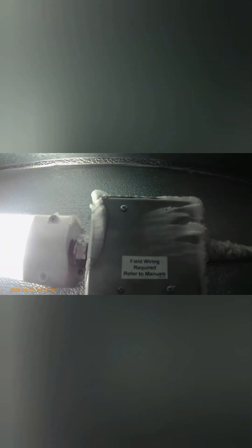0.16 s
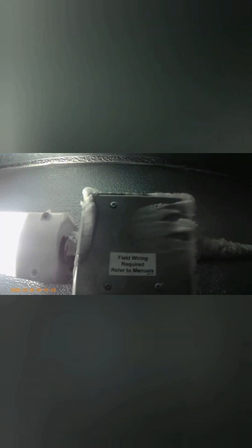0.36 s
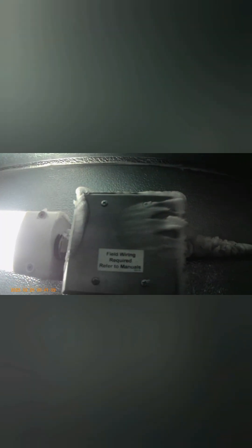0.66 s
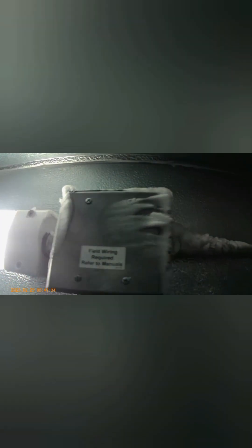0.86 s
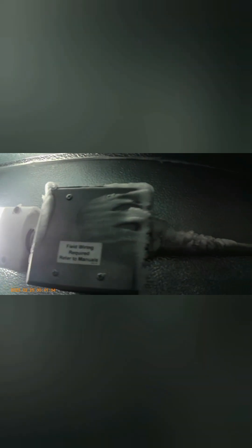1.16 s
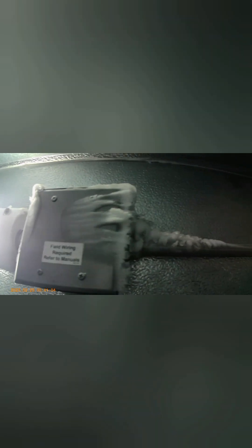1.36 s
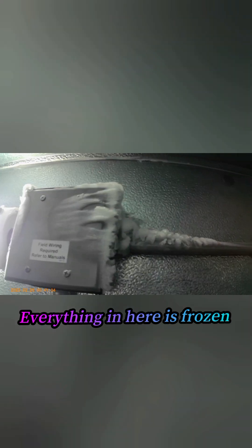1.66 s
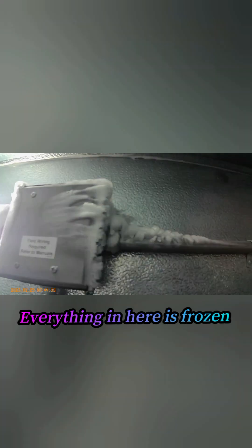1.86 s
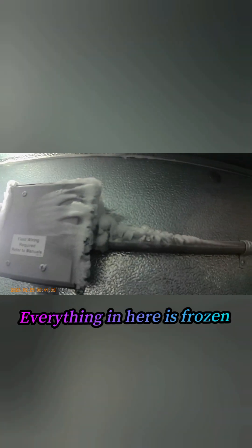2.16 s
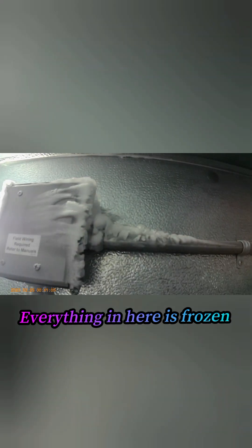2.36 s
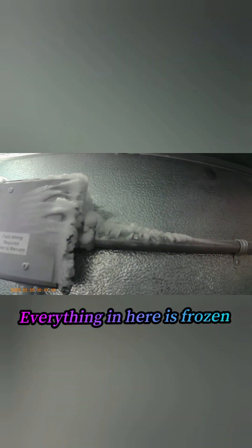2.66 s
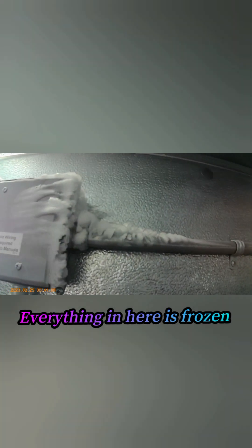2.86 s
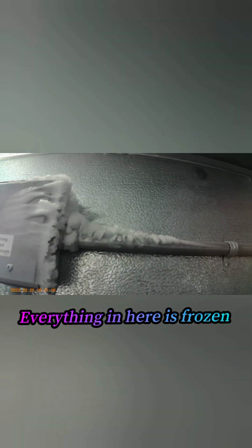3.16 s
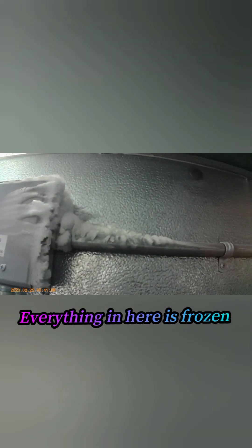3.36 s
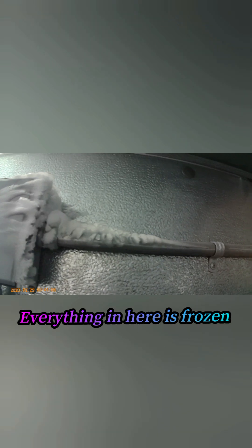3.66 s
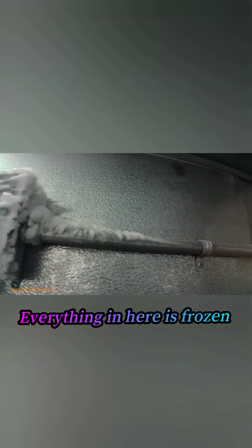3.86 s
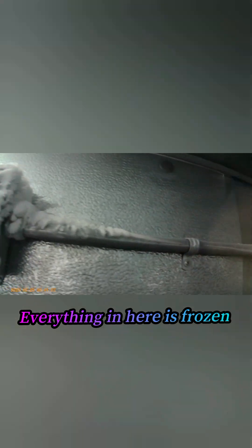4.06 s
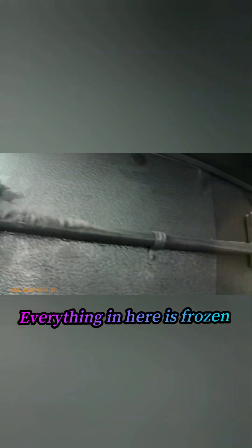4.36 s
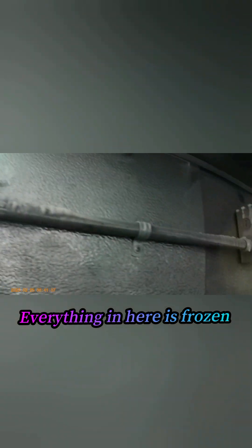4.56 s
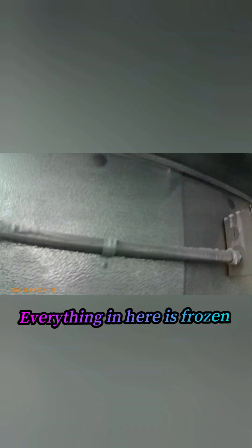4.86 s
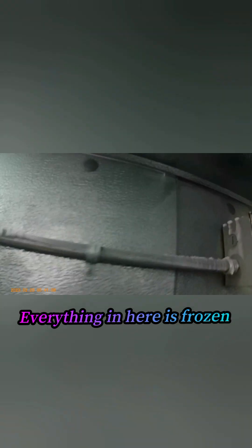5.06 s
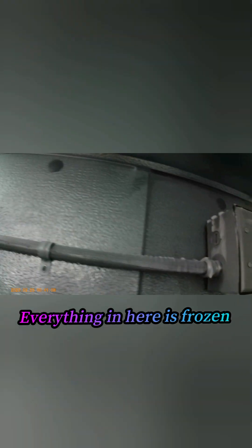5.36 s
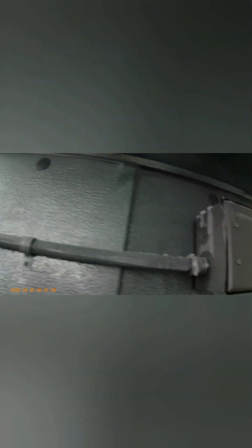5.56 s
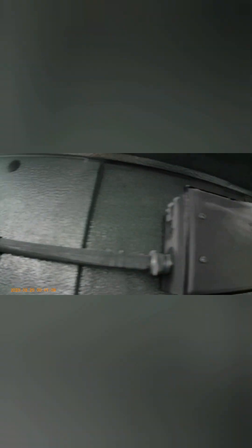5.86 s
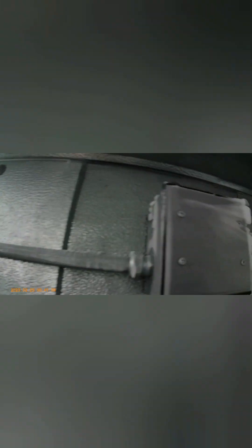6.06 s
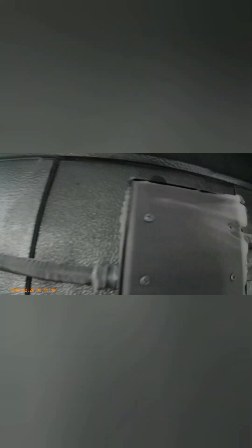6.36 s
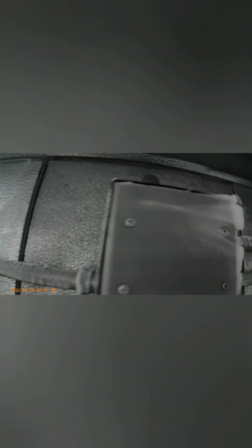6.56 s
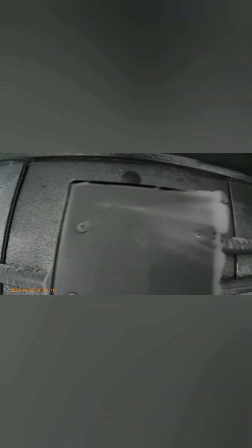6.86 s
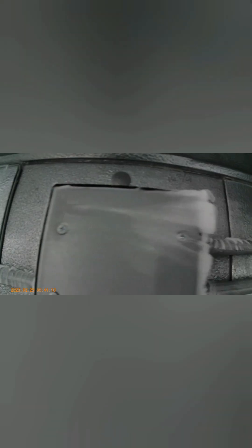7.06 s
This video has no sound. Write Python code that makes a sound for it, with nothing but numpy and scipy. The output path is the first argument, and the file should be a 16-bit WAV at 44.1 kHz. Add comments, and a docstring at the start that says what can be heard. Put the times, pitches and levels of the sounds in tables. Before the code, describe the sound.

Freezer fans drone loudly, steady low tones swelling and fading over rushing air, with tiny ticks midway and heavy wind thumps on the microphone near the end.

```python
"""Evaporator fans run in a walk-in freezer while the microphone is carried slowly along the wall.
Their tones, sums of sines at multiples of the shaft rate, swell and fade in the standing waves of the
metal room. Steady sines make the motor hum; shaped and resonant noise makes the rush of air.
Rumbling noise and single pressure swings buffet the microphone, most strongly in the last two seconds.
Before that come three small ticks, each a burst of noise with a ringing decay."""
import sys
import numpy as np
from scipy import signal
from scipy.fft import rfft, irfft
from scipy.io import wavfile

SR = 44100
rng = np.random.default_rng(int(sys.argv[2]) if len(sys.argv) > 2 else 0)


def wav_out(sig):
    """Save sig, one row per channel (or a flat mono array), as 16-bit PCM at SR to the path in sys.argv[1]."""
    wavfile.write(sys.argv[1], SR, np.round(np.clip(np.atleast_2d(sig).T, -1, 1) * 32767).astype(np.int16))


N = 317961
TIME = np.arange(N) / SR  # s


def from_db(db):
    """Logarithmic level: 20 dB is a factor of ten in amplitude."""
    return 10 ** (np.asarray(db) / 20)


def rms_one(x):
    """Power normalisation: scale to a root-mean-square of 1."""
    return x / np.sqrt(np.mean(np.abs(x) ** 2))


def in_time(rows):
    """Linear interpolation: each column of a time curve at every sample."""
    s, *columns = np.transpose(rows)
    return np.squeeze([np.interp(TIME, s, column) for column in columns])


def drift(rate):
    """Low-pass random process: slow chance with spread 1, changing about `rate` times a second."""
    step = 100  # samples between computed values
    settling = 2000  # steps discarded while the filter settles
    r = np.exp(-2 * np.pi * rate * step / SR)
    white = rng.standard_normal(N // step + settling + 2)
    slow = signal.lfilter([1], [1, -2 * r, r * r], white)[settling:]
    return np.interp(np.arange(N) / step, np.arange(len(slow)), rms_one(slow - slow.mean()))


def colour(x, spectrum):
    """Spectral shaping: give a flat-spectrum sound the density `spectrum`, in dB per Hz."""
    hz, db = np.transpose(spectrum)
    bins = np.maximum(np.fft.rfftfreq(N, 1 / SR), 1)
    # straight lines over log frequency; silence outside the table
    gain = from_db(np.interp(np.log(bins), np.log(hz), db, left=-200, right=-200))
    return irfft(rfft(x) * gain, N) * np.sqrt(SR / 2)


def noise(spectrum):
    """Stationary random noise with the given spectral density."""
    return colour(rng.standard_normal(N), spectrum)


def band_around(x, hz, width_hz):
    """Heterodyne filter: shift a band to zero, low-pass it and shift it back; its centre may glide."""
    carrier = np.exp(2j * np.pi * np.cumsum(hz * np.ones(N)) / SR)
    r = np.exp(-np.pi * width_hz / SR)
    baseband = signal.lfilter([1 - r], [1, -r], x / carrier)
    return 2 * np.real(carrier * baseband)


def resonance(hz, width_hz):
    """Resonance driven by turbulence: noise through the same band twice for steep sides; rms 1."""
    once = band_around(rng.standard_normal(N), hz, width_hz)
    return rms_one(band_around(once, hz, width_hz))


BLADES = 5
THROB_ORDER = 6  # multiple of the shaft rate that throbs
THROB_DB, THROB_PERIOD_S, THROB_PEAK_S = 1.5, .94, 2.93
# Blade-passing tone along the way through the standing waves: start_s [s], level_db [dB rms]
FIRST_BLADE_TONE = [(0.0, -38), (1.1, -41.5), (1.6, -27), (3.3, -27.5), (3.9, -46), (4.4, -24.5),
                    (5.0, -38.5), (5.5, -31), (5.9, -28.5), (6.25, -42), (6.55, -35.5), (7.2, -48)]
# Its octave: start_s [s], level_db [dB rms]
SECOND_BLADE_TONE = [(0.0, -23.5), (0.75, -28), (1.6, -22), (2.2, -25), (3.1, -22), (3.5, -23.5),
                     (4.35, -20.5), (4.7, -24.5), (5.1, -20.5), (5.6, -21.5), (5.93, -28.5), (6.1, -23.5),
                     (6.4, -31), (6.75, -29), (7.0, -23), (7.2, -21.5)]
# Tone at three times the blade-passing rate: start_s [s], level_db [dB rms]
THIRD_BLADE_TONE = [(0.0, -17), (0.3, -21.5), (0.55, -29.5), (1.8, -25), (2.4, -32.5), (3.45, -28.5),
                    (3.9, -34.5), (4.45, -30.5), (4.7, -22.5), (4.88, -34), (5.3, -24), (5.45, -32),
                    (5.62, -20), (5.82, -21.5), (5.9, -35), (5.98, -25), (6.55, -23), (7.2, -35)]
# Other strong tones on the way; the throb is added to one of them.
# multiple of the shaft rate: rows of start_s [s], level_db [dB rms]
STRONG_TONES = { 6: [(0.0, -26.5), (0.5, -22), (1.1, -28.5), (1.7, -30), (4.0, -27.5), (4.4, -31),
                (5.0, -27.5), (7.2, -28)], 13: [(0.0, -33.5), (1.1, -28.5), (3.3, -38), (4.8, -44.5),
                (5.9, -28.5), (7.2, -38.5)], 18: [(0.0, -25), (0.3, -23), (1.9, -28.5), (2.6, -30.5),
                (3.3, -27), (4.5, -36), (5.0, -30), (5.6, -41.5), (7.2, -36.5)], 25: [(0.0, -39),
                (3.9, -37.5), (4.6, -35), (5.55, -28.5), (5.9, -30), (6.25, -32), (6.7, -27.5), (7.0, -26)]}
# Tones loudest at one spot on the way, before a slow random fade.
# multiple of the shaft rate: spot_s [s], level_db [dB rms], fall [dB per s]
LOCAL_TONES = {9: (0.3, -31.5, 0.93), 12: (4.4, -32.5, 4.8), 20: (0.47, -32, 1.9), 24: (9.5, -39.5, 1.8),
               30: (6.1, -35, 0.65), 35: (2.4, -44.5, 0.64), 40: (5.3, -43, 1.7)}
# Weaker tones that fill the whole room, before a slow random fade.
# multiple of the shaft rate: level_db [dB rms]
ROOM_TONES = {4: -43, 7: -36.5, 8: -36.5, 11: -42, 14: -41, 16: -42, 17: -37.5, 19: -47, 21: -44.5, 22:
              -44.5, 27: -46, 28: -48, 42: -49, 44: -52, 46: -59.5, 48: -58.5, 50: -49, 55: -51, 58: -61,
              60: -51, 63: -56.5, 64: -58, 67: -63.5, 73: -60}


def tone_levels(room_fade_db=2.5, local_fade_db=1.0, fade_rate=0.73):
    """Standing waves: each tone's level follows the microphone's way through its crests and nodes."""
    levels = {
        BLADES: in_time(FIRST_BLADE_TONE),
        2 * BLADES: in_time(SECOND_BLADE_TONE),
        3 * BLADES: in_time(THIRD_BLADE_TONE),
    }
    for order, path in STRONG_TONES.items():
        levels[order] = in_time(path)
    # one tone throbs as the fans beat against each other
    throb = np.cos(2 * np.pi * (TIME - THROB_PEAK_S) / THROB_PERIOD_S)
    levels[THROB_ORDER] = levels[THROB_ORDER] + THROB_DB * throb
    for order, (spot_s, db, fall_db_per_s) in LOCAL_TONES.items():
        near_spot_db = db - fall_db_per_s * np.abs(TIME - spot_s)
        levels[order] = near_spot_db + local_fade_db * drift(fade_rate)
    for order, db in ROOM_TONES.items():
        levels[order] = db + room_fade_db * drift(fade_rate)
    return levels


def flutter(depth, rate):
    """Random modulation: turbulent inflow shakes a tone in strength and phase; mean power 1."""
    return rms_one(1 + depth * (drift(rate) + 1j * drift(rate)))


SHAFT_HZ = 26.572
BLADE_SHAKE, SHAFT_SHAKE = .04, .012  # flutter depth, before growing with the root of the order


def fan_tones(wander_hz=0.019, blade_wander_hz=0.0638):
    """Harmonics of rotation: multiples of the shaft rate, among them the wavering blade-passing tones."""
    shaft = 2 * np.pi * np.cumsum(SHAFT_HZ + wander_hz * drift(0.55)) / SR
    blades = shaft + 2 * np.pi * np.cumsum(blade_wander_hz * drift(0.782)) / SR
    out = np.zeros(N)
    for order, db in tone_levels().items():
        # shaft tones are nearly clean; blade tones cut through turbulence, the higher the more shaken
        if order % BLADES:
            turn, depth = shaft, SHAFT_SHAKE
        else:
            turn, depth = blades, BLADE_SHAKE
        shake = flutter(depth=depth * np.sqrt(order), rate=3.5)
        angle = order * turn + rng.uniform(0, 2 * np.pi)
        out += np.sqrt(2) * from_db(db) * np.real(shake * np.exp(1j * angle))
    return out


MOTOR_WAVER_DB = 0.5
# Electric motor hum and whine: pitch_hz [Hz], level_db [dB rms, before the slight waver]
MOTOR = [(58.2, -32), (116.5, -43.5), (225.1, -36.5), (274.5, -40.5), (990.5, -53.5)]


def motor():
    """Line spectrum: clean sines of fixed pitch whose levels waver slightly."""
    out = np.zeros(N)
    for hz, db in MOTOR:
        gain = from_db(db + MOTOR_WAVER_DB * drift(0.37))
        out += np.sqrt(2) * gain * np.sin(2 * np.pi * (hz * TIME + rng.random()))
    return out


ROAR_DB, HISS_DB = 0.5, -0.58  # shift of each spectrum below at the start
AIR_FALL_DB_PER_S = 0.0962  # how slowly roar and hiss recede
HOWL_WIDTH_HZ, WALL_DIP_WIDTH_HZ = 55, 67
# Air churned by the blades: pitch_hz [Hz], density_db [dB per Hz, before shift, fall and flicker]
ROAR = [(20, -69), (45, -64.5), (80, -59.5), (125, -49), (145, -50.5), (195, -49.5), (250, -47),
        (310, -50.5), (400, -53.5), (490, -53.5), (640, -55.5), (780, -55), (970, -64), (1300, -63),
        (1800, -70.5), (2800, -94)]
# Air hissing through the cooling fins: pitch_hz [Hz], density_db [dB per Hz, before the same]
HISS = [(1200, -82.5), (2200, -74.5), (2850, -84), (3450, -81.5), (4000, -86.5), (4750, -95.5),
        (5500, -96.5), (6400, -103), (7000, -110), (7600, -109), (9900, -116.5), (10200, -124),
        (11000, -128)]
# Resonances of the cooler's casing, blown by the air: pitch_hz [Hz], width_hz [Hz],
# level_db [dB rms, before the wall's echo]
CASING = [(574, 58, -36.5), (755, 48, -42), (876, 35, -46), (1085, 150, -45.5)]
# Strongest resonance, a hollow howl that mostly rises in pitch: start_s [s], pitch_hz [Hz],
# level_db [dB rms, before the wall's echo]
HOWL = [(1.2, 625.4, -29.5), (3.2, 626.5, -31), (4.2, 632, -30.5), (4.9, 635, -29.5), (5.55, 648, -26.5),
        (6.2, 647, -36), (7.0, 674, -39)]
# Band altered by the wall's echo as the microphone moves: start_s [s], pitch_hz [Hz],
# gain_db [dB, positive lifts the band]
WALL_DIP = [(4.2, 388, 6), (4.75, 420, -15), (5.15, 444, -12.5), (5.6, 474, -5.5), (7.1, 510, 2)]


def air(roar_flicker_db=0.7, hiss_flicker_db=0.5):
    """Turbulence and interference: roar, casing, howl and hiss, one band altered by the wall's echo."""
    recede_db = -AIR_FALL_DB_PER_S * TIME
    roar = from_db(ROAR_DB + recede_db + roar_flicker_db * drift(8.4)) * noise(ROAR)
    casing = sum(from_db(db) * resonance(hz, width) for hz, width, db in CASING)
    howl_hz, howl_db = in_time(HOWL)
    howl = from_db(howl_db) * resonance(howl_hz, HOWL_WIDTH_HZ)
    hiss = from_db(HISS_DB + recede_db + hiss_flicker_db * drift(2.9)) * noise(HISS)
    rush = roar + casing + howl + hiss
    dip_hz, dip_db = in_time(WALL_DIP)
    return rush - (1 - from_db(dip_db)) * band_around(rush, dip_hz, WALL_DIP_WIDTH_HZ)


BOOM_WIDTH_HZ = 65
# Crests of standing waves passed on the way: crest_s [s], pitch_hz [Hz], level_db [dB rms],
# fall away from the crest [dB per s]
BOOMS = [(0.15, 401, -30, 18.5), (0.2, 1023, -40.5, 8), (1.1, 1370, -40.5, 10), (1.58, 232, -25, 70),
         (1.8, 428, -32.5, 17), (4.301, 300.4, -30.5, 18), (5.5, 309, -30, 18), (5.7, 872, -41, 4),
         (5.9, 363, -24, 60.5), (6.45, 387.6, -28, 16), (7.05, 122.6, -28.5, 11.5)]


def room_boom():
    """Room modes: rushing air excites standing waves, loudest where the microphone passes each crest."""
    out = np.zeros(N)
    for s, hz, db, fall_db_per_s in BOOMS:
        level_db = db - fall_db_per_s * np.abs(TIME - s)
        out += from_db(level_db) * resonance(hz, BOOM_WIDTH_HZ)
    return out


GUST_ATTACK_DB_PER_S = 137  # how fast a gust builds
CALM_DB = -49  # faint draught between gusts
# Gusts of the air stream on the microphone: peak_s [s], level_db [dB], release [dB per s]
GUSTS = [(0.05, -27, 23.5), (0.35, -26, 90.5), (1.17, -40, 52), (5.46, -24.5, 12.5), (5.9, -26.5, 28),
         (6.18, -28.5, 8), (7.08, -29, 22)]


def draught_db():
    """Attack and exponential decay: each gust builds fast and dies away to a faint draught."""
    level_db = np.full(N, float(CALM_DB))
    for s, db, release_db_per_s in GUSTS:
        below_peak_db = np.maximum(GUST_ATTACK_DB_PER_S * (s - TIME), release_db_per_s * (TIME - s))
        level_db = np.maximum(level_db, db - below_peak_db)
    return level_db


# Colour of the rumble on the microphone: pitch_hz [Hz], relative density_db [dB per Hz]
BUFFET = [(15, -9.5), (35, -9), (85, 6), (160, -1), (300, -6.5), (600, -12), (1500, -44.5)]
# Single eddies popping on the microphone: centre_s [s], level_db [dB peak], pitch_hz [Hz]
EDDIES = [(0.351, -13, 80), (0.369, -10, 125), (5.4553, -4, 140), (5.463, -4.5, 160), (5.477, -8, 380),
          (5.5004, -14, 210), (5.568, -10, 230), (5.5748, -11.5, 125), (5.667, -0.5, 139),
          (5.7666, -6, 200), (6.167, -10.5, 236), (6.5653, -2, 185)]


def buffeting(lump_db=2.0):
    """Flow-induced pressure: lumpy low rumble, and strong eddies that swing from suction to pressure."""
    lumps = from_db(lump_db * drift(25))
    out = from_db(draught_db()) * rms_one(lumps) * rms_one(noise(BUFFET))
    for s, db, hz in EDDIES:
        swing = 2 * np.pi * hz * (TIME - s)
        out += from_db(db) * swing * np.exp((1 - swing ** 2) / 2)  # peaks of 1 at swing = -1 and 1
    return out


ROOM_T60_S = 0.48  # time for the ring to fall by 60 dB
# Small hard ticks in the room: start_s [s], level_db [dB rms of the ring at its start]
TICKS = [(4.364, -24.5), (4.386, -32.5), (4.423, -31.5)]
# Colour of the ticks: pitch_hz [Hz], relative density_db [dB per Hz]
TICK_COLOUR = [(300, 0), (750, 15), (1500, 7.5), (2700, -6.5), (4100, -11.5), (5000, -22), (6000, -30.5),
               (8000, -37), (11000, -41)]


def ticks(crack_db=5.0, crack_t60=0.013):
    """Impulse and reverberation: a short crack, then the exponential ring of the metal-lined room."""
    power = np.zeros(N)
    for s, db in TICKS:
        age = np.maximum(TIME - s, 0)
        tail = np.exp(-np.log(1000) * age / ROOM_T60_S)
        crack = from_db(crack_db) * np.exp(-np.log(1000) * age / crack_t60)
        power += (TIME >= s) * from_db(db) ** 2 * (tail ** 2 + crack ** 2)
    white = rng.standard_normal(N)
    burst = colour(np.sqrt(power) * white, TICK_COLOUR)
    return burst / np.std(colour(white, TICK_COLOUR))


def scene():
    """Superposition: the pressures of all sources add at the one microphone."""
    return (fan_tones() + motor() + air() + room_boom() + buffeting() + ticks())[None]


CUTOFF_HZ = 10800


def record(dry):
    """Overload and band limit: excess peaks clip, both ends ease over 2 ms, the top is cut."""
    ease = np.clip(np.minimum(TIME, TIME[-1] - TIME) / .002, 0, 1)
    clipped = np.clip(dry, -1, 1) * ease
    low_pass = signal.ellip(10, .1, 90, CUTOFF_HZ, fs=SR, output="sos")
    return signal.sosfilt(low_pass, clipped)


dry = scene()
out = record(dry)
wav_out(out)
```